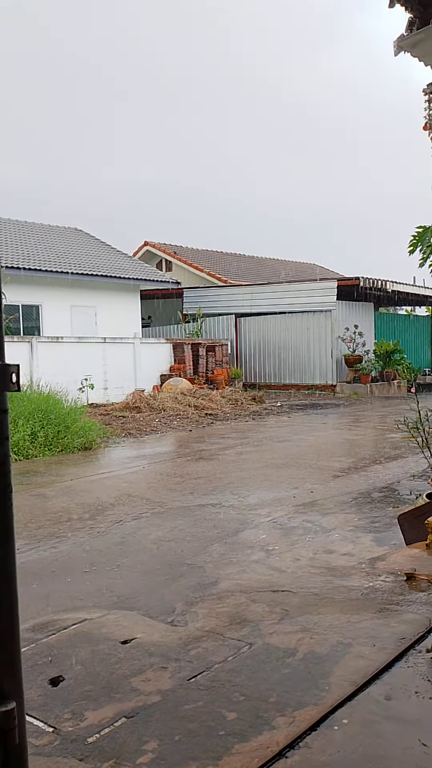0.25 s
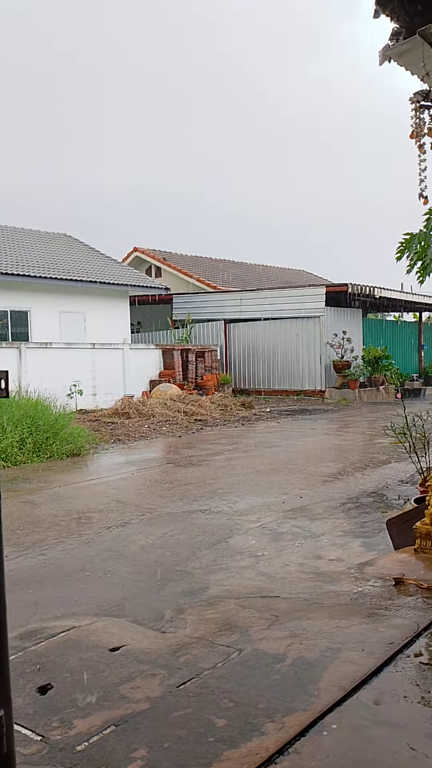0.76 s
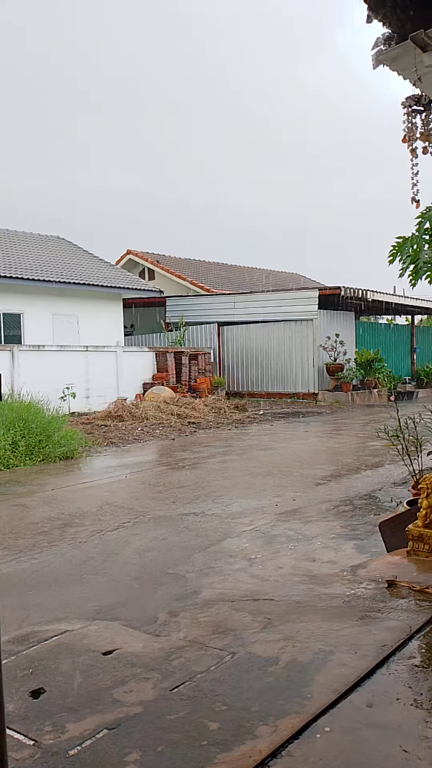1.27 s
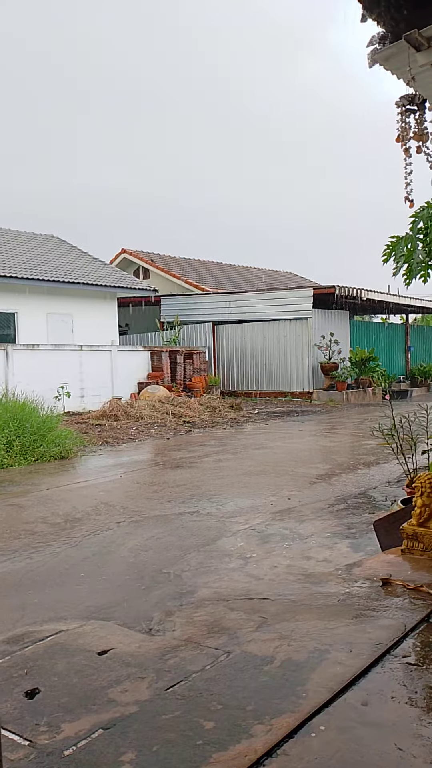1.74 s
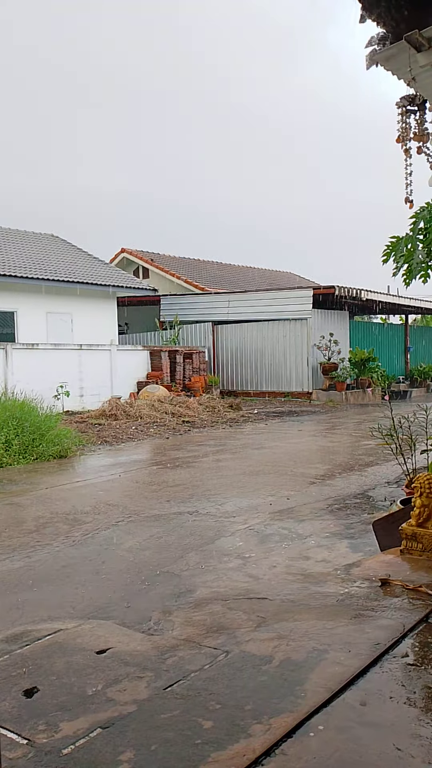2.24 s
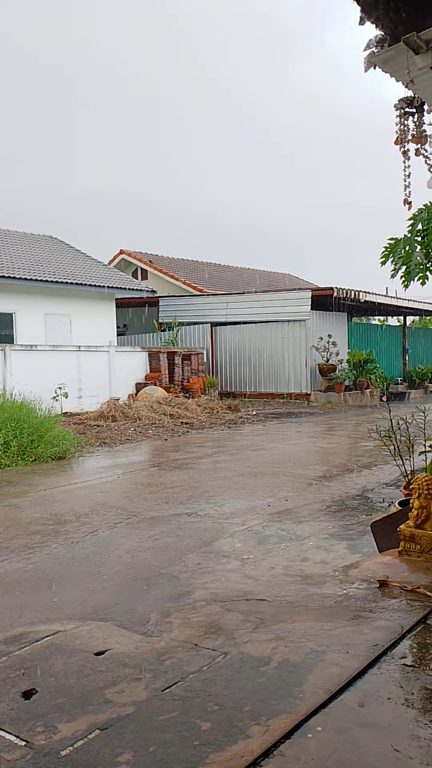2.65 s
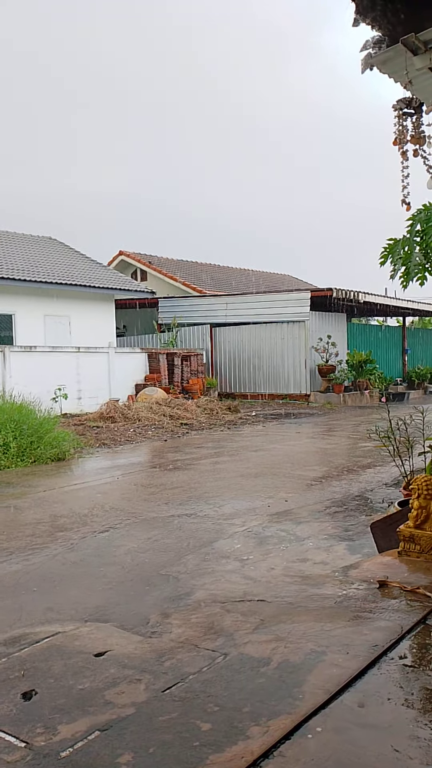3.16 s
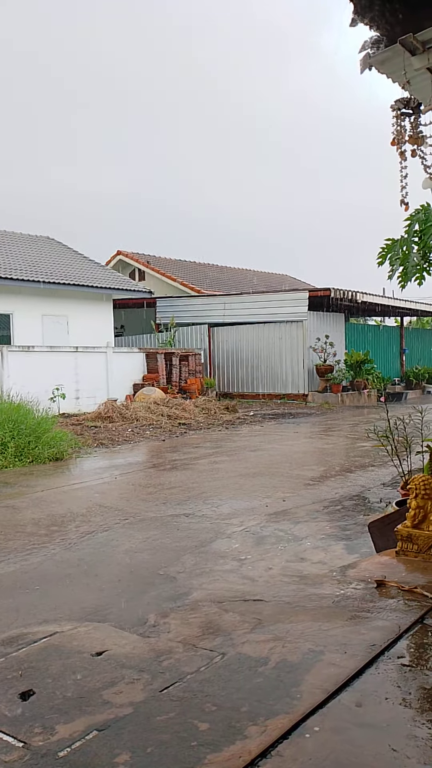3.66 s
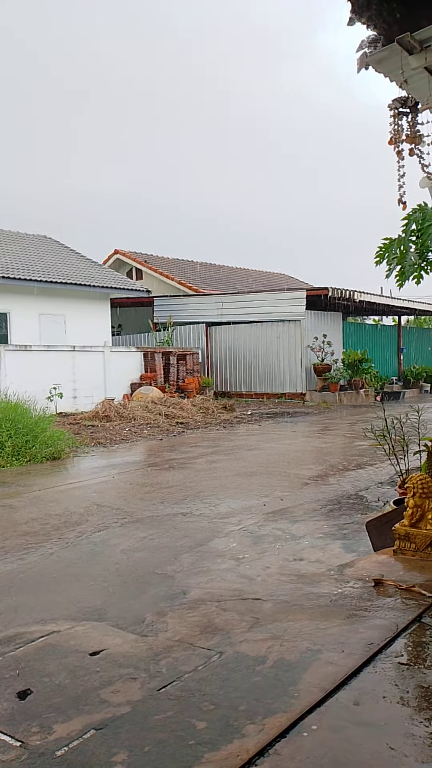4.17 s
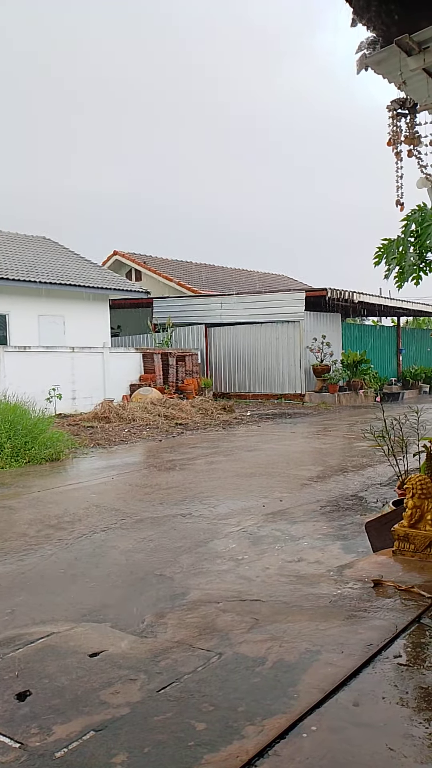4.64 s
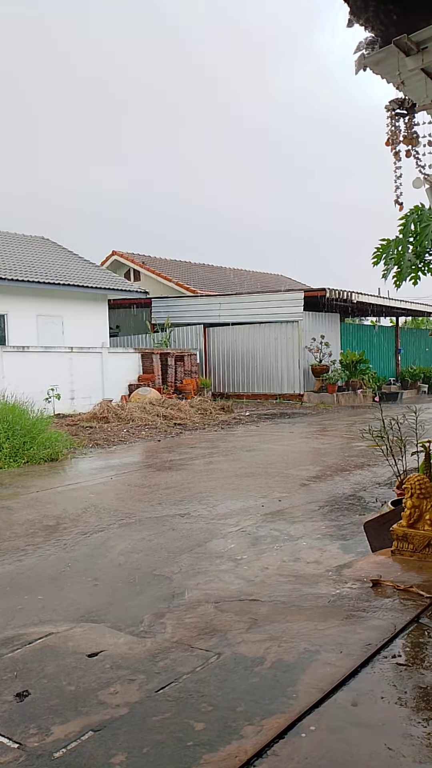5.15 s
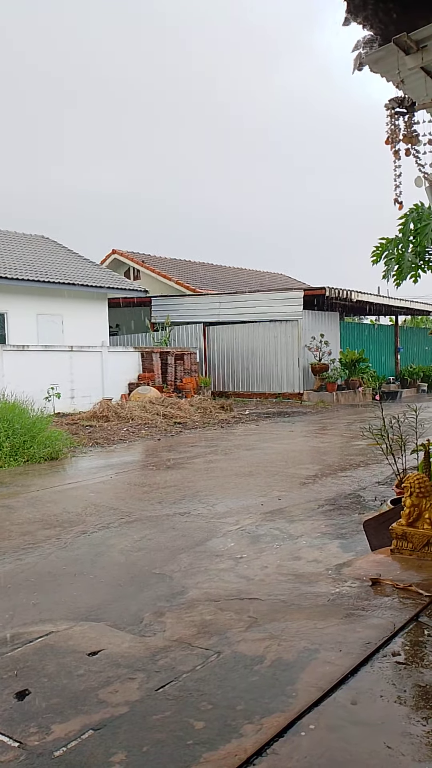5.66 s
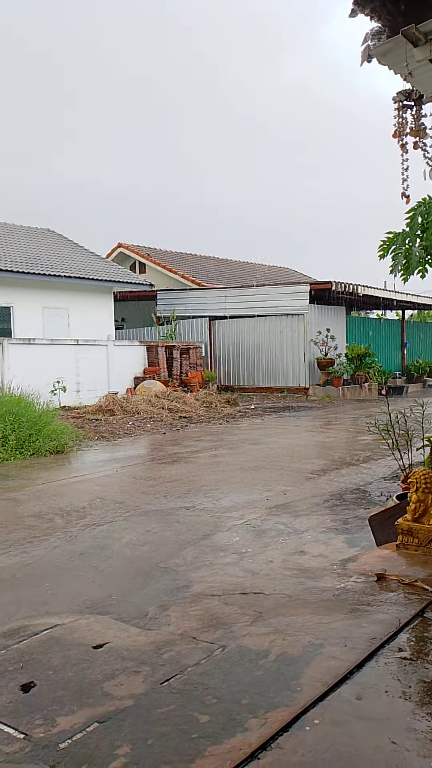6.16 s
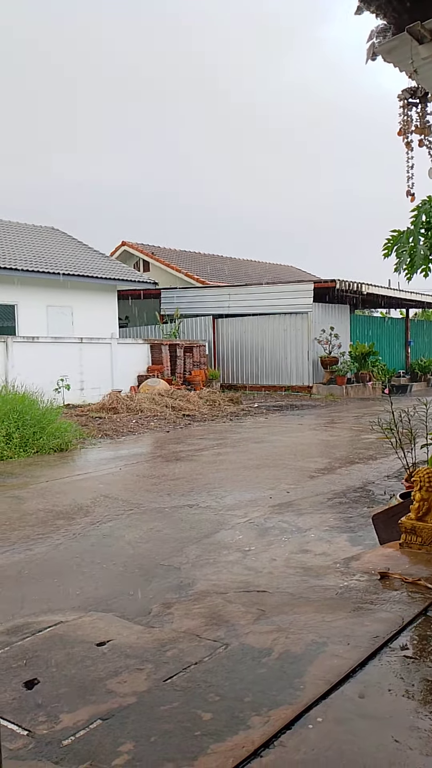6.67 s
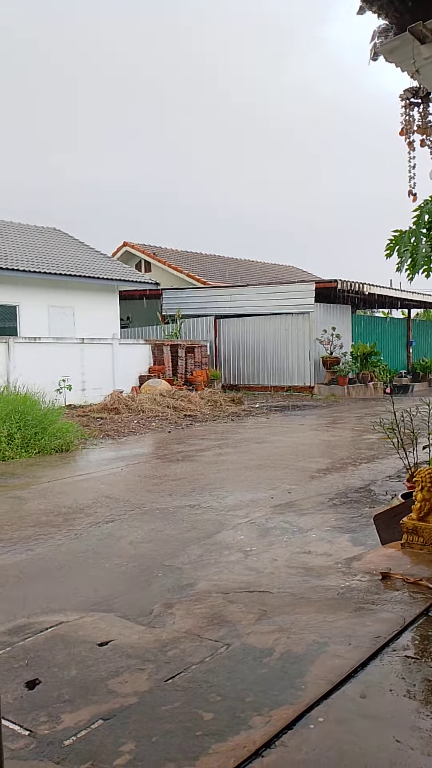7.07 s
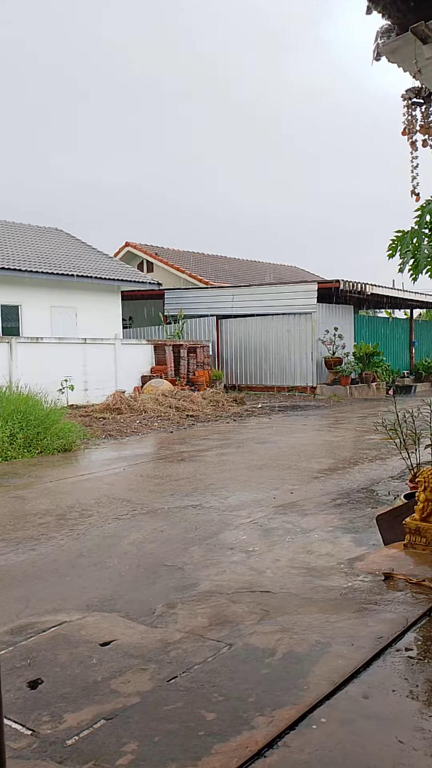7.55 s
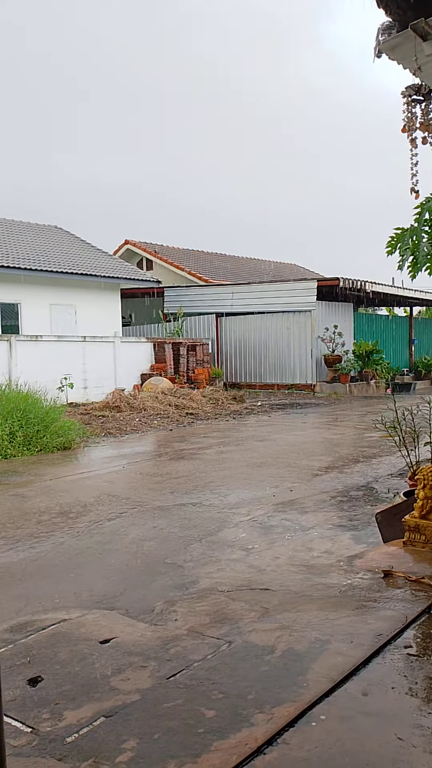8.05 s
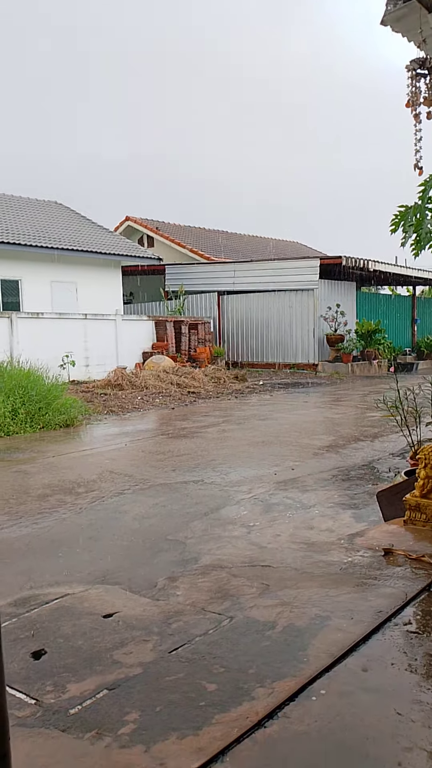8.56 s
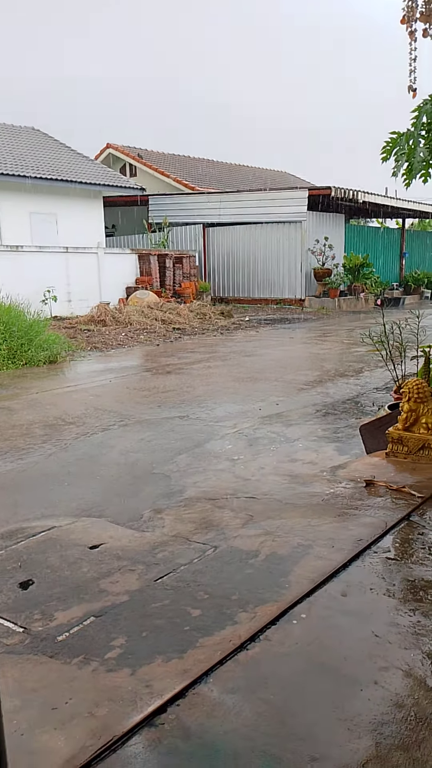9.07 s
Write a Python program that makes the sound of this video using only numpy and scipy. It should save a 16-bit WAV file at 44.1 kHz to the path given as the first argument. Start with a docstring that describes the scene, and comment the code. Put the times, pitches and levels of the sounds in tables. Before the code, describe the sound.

Even, bright rainfall outdoors, heard from under a roof edge, with fine patter, scattered sharp drips, tiny bubbly plops and two soft thuds.

```python
"""A steady hiss of rain on a wet concrete yard between houses, heard from under the eaves.
It is made of countless far drops, built from coloured noise; its level drifts slightly down, with a late rise.
Nearer drops patter as single ticks and ring small bubbles; sheet roofs drum faintly.
Fat drips from the roof edge smack on the slab and throw spray; a few plop in a puddle or thud.
At listed times, often at a hard drip, the level of hiss, bubbles and patter dips and creeps back."""
import sys
import numpy as np
from scipy import signal
from scipy.fft import rfft, irfft, next_fast_len
from scipy.io import wavfile

SR = 44100
rng = np.random.default_rng(int(sys.argv[2]) if len(sys.argv) > 2 else 0)


def int16_out(signal):
    """Quantize to a 16-bit WAV file."""
    q = np.round(np.clip(np.atleast_2d(signal).T, -1, 1) * 32767)
    wavfile.write(sys.argv[1], SR, q.astype(np.int16))


N = 410571

# hiss of the wet yard, relative spectrum: (f/Hz, level per Hz/dB)
HISS_SPECTRUM = [(400, -24), (900, -10.5), (1300, -8), (1500, -5.5), (1750, -2), (2000, 0.5), (2300, 1.5),
                 (2750, 0.35), (3200, -4), (3900, -9.5), (4450, -10.5), (5500, -17), (6400, -21.5),
                 (7400, -23)]
# dull wash from far roofs and ground, relative spectrum: (f/Hz, level per Hz/dB)
WASH_SPECTRUM = [(20, -16), (45, -6.5), (95, -4.5), (145, -7), (175, -2.5), (270, -1.5), (360, -0.6),
                 (500, 0.5), (860, 0), (1080, -3.5), (1500, -8), (3000, -22.5)]
# colour of the near drops, relative spectrum: (f/Hz, level/dB)
SPLASH_SPECTRUM = [(500, -16.5), (1400, -4), (2400, 2.5), (3700, -0.5), (4500, -4), (5500, -7),
                   (6400, -0.5), (7400, -14)]
# the drumming note of the sheet roofs, its time to fall by 60 dB, and its level beside the hiss and wash
ROOF_HZ, ROOF_T60_S, ROOF_DB = 229.4, 0.1, -20.5
# slow drift of the level heard, slightly down with one late rise: (t/s, level/dB)
SLOW_LEVEL = [(0, -31), (1.6, -31), (3.9, -31.5), (6.3, -32.5), (7.1, -31.5), (7.8, -31.2), (8.2, -32),
              (9.3, -32.5)]
# moments when the level heard ducks: (t/s, depth/dB)
LEVEL_DIPS = [(0.895, 1.5), (2.6, 1.2), (3.26, 1.0), (6.695, 3), (7.295, 2.5), (7.895, 1.4), (8.11, 1.7),
              (8.89, 2)]
DIP_FALL_S, DIP_HOLD_S, DIP_RECOVERY_DB_PER_S = 0.012, 0.048, 7.5
# level of the near patter; share of the level changes in dB that it follows
PATTER_DB, PATTER_FOLLOWS = -42.5, 0.6
# drips that thud on something hollow: (t/s, level before swell and decay/dB, f/Hz, time to fall 60 dB/s)
HOLLOW_THUDS = [(2.991, -32.5, 205, .12), (3.425, -32, 191, .19)]
# drips that plop into a puddle: (t/s, peak/dB, bubble f/Hz, half the time over which bubbles form/s)
PUDDLE_PLOPS = [(0.071, -26, 3370, .018), (3.224, -24, 3600, .018), (4.647, -24, 2770, 0.0033),
                (4.658, -26, 3750, .008), (5.361, -25, 3750, .014), (6.301, -24, 2950, .012),
                (6.579, -22.5, 2530, .02), (6.935, -27.5, 3550, .018)]
# drips on the slab at set times, mostly hard:
# (t/s, smack peak/dB, spray/dB against the smack, before it is halved)
SLAB_DRIPS = [(0.4718, -28, -14), (0.8973, -19.5, -16), (1.057, -24.5, -11), (1.309, -26.5, -8.5),
              (1.7155, -27.5, -8), (1.8452, -28.5, -8), (2.6055, -29, -4), (2.7377, -25.5, -6.5),
              (3.228, -30, -5.5), (3.6456, -29, -4.5), (3.9295, -31.5, -11), (4.365, -26, -9),
              (4.8465, -25.5, -14), (5.1784, -28, -12), (6.0132, -29.5, -11), (6.224, -31.5, -4),
              (6.7002, -28, -12.5), (7.2946, -26.5, -7), (7.416, -28.5, -10.5), (8.08, -31.5, -8),
              (8.1145, -30.5, -1), (8.7969, -29, -11)]
# drips at random times: how often, typical smack peak and its spread, spray setting as above
RANDOM_DRIPS_PER_S, RANDOM_DRIP_DB, RANDOM_DRIP_SPREAD_DB, RANDOM_SPRAY_DB = 4.5, -31.5, 2.2, -11
# close echoes from the house wall and eaves: (delay/s, level/dB)
ECHOES = [(0.0104, -9.5), (.026, -22)]
# how the treble fades at the top: (f/Hz, level/dB)
TREBLE_FADE = [(6900, 0), (7200, -2), (7500, -11), (7750, -22), (7900, -36)]
CUTOFF_HZ = 7900


def from_db(db):
    """Decibels to gain."""
    return 10 ** (np.asarray(db) / 20)


def rms_one(x):
    """Scale to an average power of 1."""
    return x / np.sqrt(np.mean(x ** 2) + 1e-20)


def in_time(rows):
    """Join (time, value) points with straight lines, one value for every sample."""
    return np.interp(np.arange(N) / SR, *np.transpose(rows))


def drift(rate_hz):
    """Smoothed noise with rms 1: a random wander at about the given rate."""
    step = 40  # work on every 40th sample, then fill in between
    r = np.exp(-2 * np.pi * rate_hz * step / SR)
    noise = rng.standard_normal(N // step + 2002)
    slow = signal.lfilter([1], [1, -2 * r, r * r], noise)[2000:]  # drop the filter's start
    return np.interp(np.arange(N) / step, np.arange(len(slow)), rms_one(slow))


def colour(x, spectrum):
    """Filter a sound with a smooth curve, falling 12 dB per octave outside it; rms 1."""
    hz, db = np.transpose(spectrum)
    size = next_fast_len(N)
    octave = np.log2(np.maximum(np.fft.rfftfreq(size, 1 / SR), 1))
    below = np.maximum(np.log2(hz[0]) - octave, 0)
    above = np.maximum(octave - np.log2(hz[-1]), 0)
    gain = from_db(np.interp(octave, np.log2(hz), db) - 12 * (below + above))
    return rms_one(irfft(rfft(x, size) * gain, size)[:N])


def ring(clicks, hz, t60):
    """Each unit click starts a sine of height 1 that falls by 60 dB in t60 seconds."""
    r = from_db(-60 / (t60 * SR))
    w = 2 * np.pi * hz / SR
    return signal.lfilter([0, np.sin(w)], [1, -2 * r * np.cos(w), r * r], clicks + 1e-18)


def impacts(per_s, spread_db):
    """Drops land as random clicks; a positive spread makes a few larger, a negative one a few smaller."""
    sizes = from_db(spread_db * np.minimum(rng.exponential(1, N), 5))
    return sizes * rng.choice([-1, 1], N) * (rng.random(N) < per_s / SR)


def far_rain(hiss_db, wash_db, flutter_db):
    """Drops too many to tell apart blend into noise: a bright hiss, a dull wash and drumming sheet roofs."""
    hiss = colour(rng.standard_normal(N), HISS_SPECTRUM) * from_db(hiss_db + flutter_db * drift(20))
    wash = from_db(wash_db) * colour(rng.standard_normal(N), WASH_SPECTRUM)
    roof_hits = np.diff(impacts(400, spread_db=-2.0), prepend=0)
    roofs = from_db(ROOF_DB) * rms_one(ring(roof_hits, ROOF_HZ, ROOF_T60_S))
    return hiss + wash + roofs


def dips():
    """Gain at the listed dips: each falls quickly, holds, and creeps back at the same rate."""
    db = np.zeros(N)
    for s, depth_db in LEVEL_DIPS:
        held = s + DIP_HOLD_S
        back = held + abs(depth_db) / DIP_RECOVERY_DB_PER_S
        db += in_time([(s - DIP_FALL_S, 0), (s, -depth_db), (held, -depth_db), (back, 0)])
    return from_db(db)


def puddles(per_s, cycles, low_hz, high_hz, count=24):
    """Some drops trap a bubble, which rings for a few cycles at the pitch of its size."""
    born = impacts(per_s, spread_db=2.0)
    dealt = rng.integers(0, count, N)  # which pitch each bubble gets
    pitches = np.geomspace(low_hz, high_hz, count)
    return rms_one(sum(ring(born * (dealt == k), hz, cycles / hz) for k, hz in enumerate(pitches)))


def near_patter(per_s, clump_db):
    """Single drops tick on the concrete; their spray makes the level swell in small clumps."""
    ticks = impacts(per_s, spread_db=3.5) * from_db(clump_db * drift(14))
    return colour(ticks, SPLASH_SPECTRUM)


def thuds(swell_cycles):
    """Something hollow gives a low note that swells over a few cycles and dies."""
    out = np.zeros(N + SR)
    t = np.arange(SR // 2) / SR
    for s, level_db, hz, t60 in HOLLOW_THUDS:
        swell = 1 - np.exp(-t * hz / swell_cycles)
        shape = from_db(level_db - 60 * t / t60) * swell
        at = int(s * SR)
        out[at:at + len(t)] += shape * np.sin(2 * np.pi * hz * t)
    return out[:N]


def plops(t60, pitch_spread, count=9):
    """A drip in a puddle traps a handful of bubbles of about one size, which ring one after another."""
    out, size = np.zeros(N + SR), SR // 5
    for s, peak_db, hz, half_time_s in PUDDLE_PLOPS:
        cluster = np.zeros(size)
        for k in range(count):
            delay_s = abs(half_time_s) * 2 * (k + rng.random()) / count
            born = np.arange(size) == int(delay_s * SR)
            pitch = hz * np.exp(pitch_spread * rng.standard_normal())
            cluster += ring(born * np.exp(-k / count), pitch, t60)  # later bubbles are weaker
        at = int(s * SR)
        out[at:at + size] += from_db(peak_db) * cluster / np.abs(cluster).max()
    return out[:N]


def random_drips():
    """More drips fall, one at a random moment in each interval; rows have the columns of SLAB_DRIPS."""
    rows = []
    for start in np.arange(0, N / SR, 1 / RANDOM_DRIPS_PER_S):
        s = start + rng.random() / RANDOM_DRIPS_PER_S
        rows.append((s, rng.normal(RANDOM_DRIP_DB, RANDOM_DRIP_SPREAD_DB), RANDOM_SPRAY_DB))
    return [row for row in rows if row[0] < N / SR]


def eave_drips(smack_s, spray_s, droplets_per_s, low_hz, top_hz):
    """Each drip is a smack, a very short noise burst, with a shower of droplets that dies away."""
    out = np.zeros(N + SR)
    t = np.arange(SR // 6) / SR
    bright = signal.butter(3, [low_hz, top_hz], "band", fs=SR, output="sos")
    for s, peak_db, spray_db in SLAB_DRIPS + random_drips():
        burst = rng.choice([-1, 1], len(t)) * np.exp(-(t / smack_s) ** 2)
        smack = signal.sosfilt(bright, burst)
        smack = smack / np.abs(smack).max()
        droplets = rng.choice([-1, 1], len(t)) * (rng.random(len(t)) < droplets_per_s / SR)
        spray = rms_one(signal.sosfilt(bright, droplets)) * np.exp(-t / spray_s) / 2
        at = int(s * SR)
        out[at:at + len(t)] += from_db(peak_db) * (smack + from_db(spray_db) * spray)
    return out[:N]


def walls(x):
    """The house wall and the eaves throw close, quieter copies of the sound back."""
    return x + sum(from_db(db) * np.pad(x, (int(abs(s) * SR), 0))[:N] for s, db in ECHOES)


def scene():
    """All sits in the middle; the changing level acts on far rain and bubbles, on the patter more mildly."""
    level = dips() * from_db(in_time(SLOW_LEVEL))
    far = far_rain(hiss_db=-1.5, wash_db=-7.0, flutter_db=0.43)
    bubbles = from_db(-9.0) * puddles(per_s=1300, cycles=14, low_hz=1610, high_hz=4810)
    patter_gain = from_db(PATTER_DB) * (level / level.mean()) ** PATTER_FOLLOWS
    patter = patter_gain * near_patter(per_s=3600, clump_db=1.93)
    puddle_drips = plops(t60=0.0091, pitch_spread=0.09)
    drips = eave_drips(smack_s=0.0018, spray_s=0.026, droplets_per_s=1600, low_hz=4200, top_hz=6840)
    rain = level * (far + bubbles) + patter
    yard = rain + walls(drips + puddle_drips) + thuds(swell_cycles=1.5)
    return np.array([yard, yard])  # the same sound left and right


def record(dry):
    """The treble fades towards the top and is then cut off."""
    hz, db = np.transpose(TREBLE_FADE)
    bins = np.fft.rfftfreq(2 * N, 1 / SR)
    gain = from_db(np.interp(bins, hz, db)) * (bins < CUTOFF_HZ)
    return irfft(rfft(dry, 2 * N) * gain)[:, :N]


dry = scene()
out = record(dry)
int16_out(out)
```